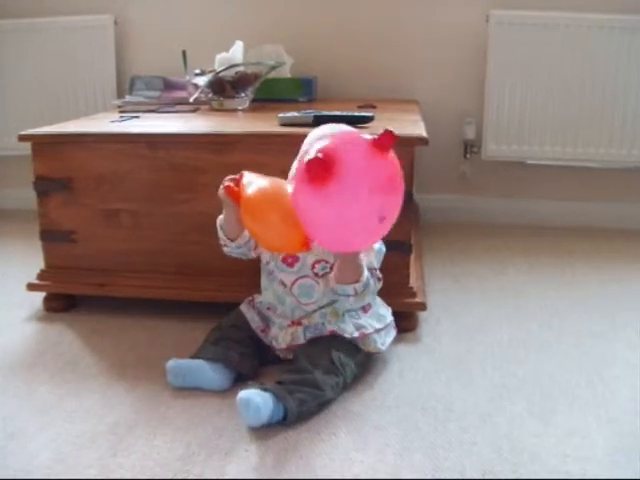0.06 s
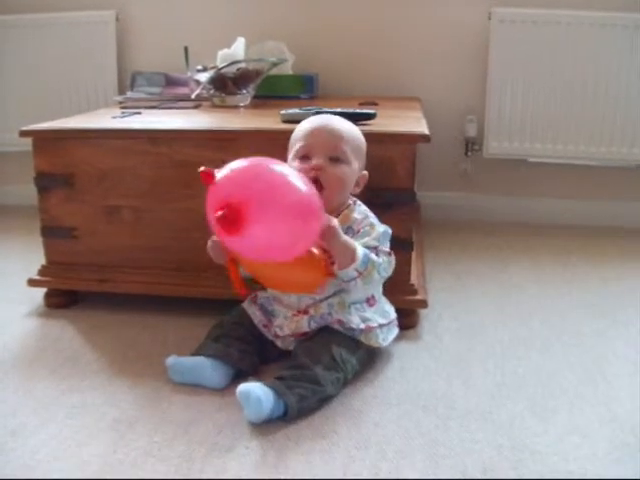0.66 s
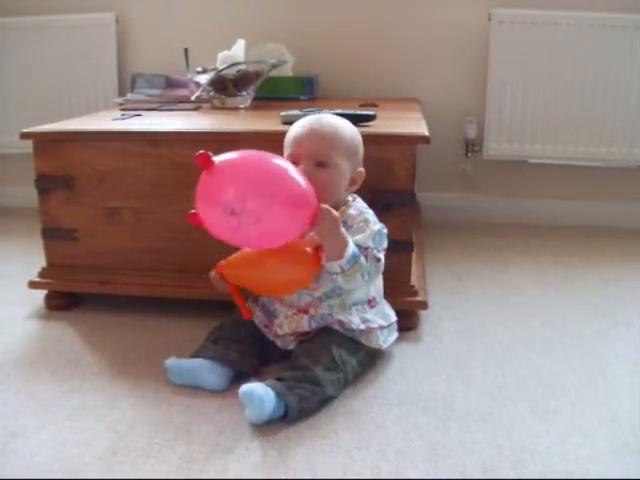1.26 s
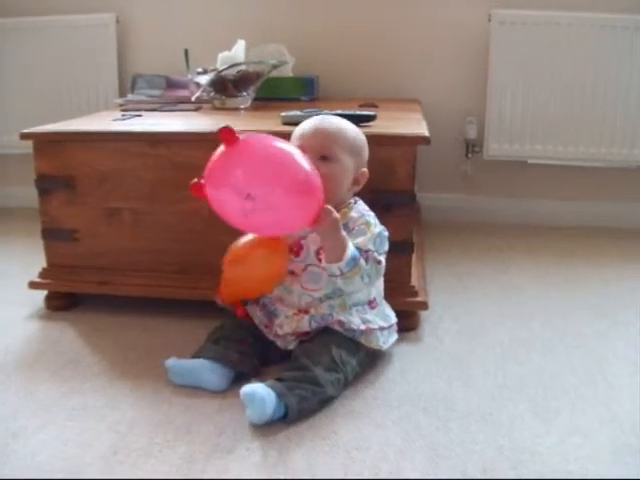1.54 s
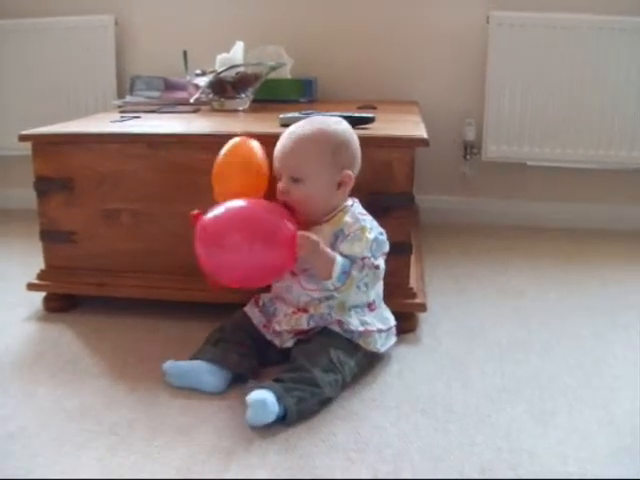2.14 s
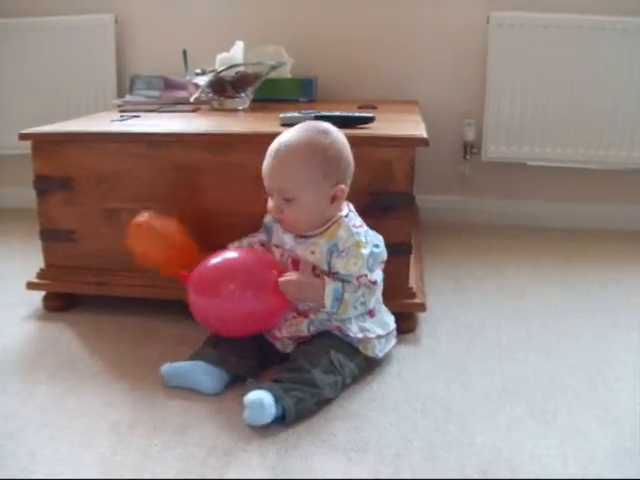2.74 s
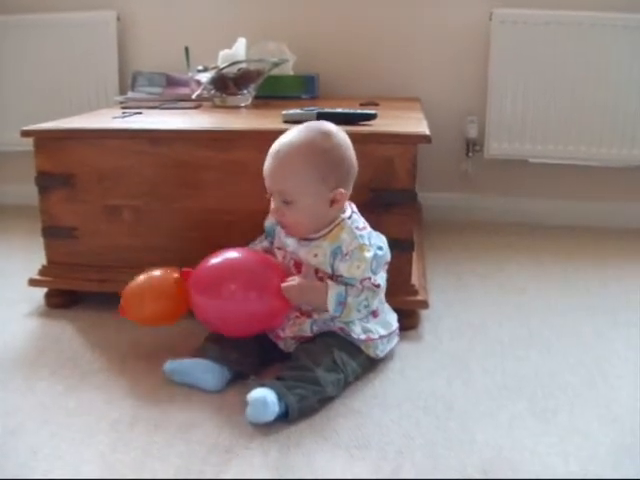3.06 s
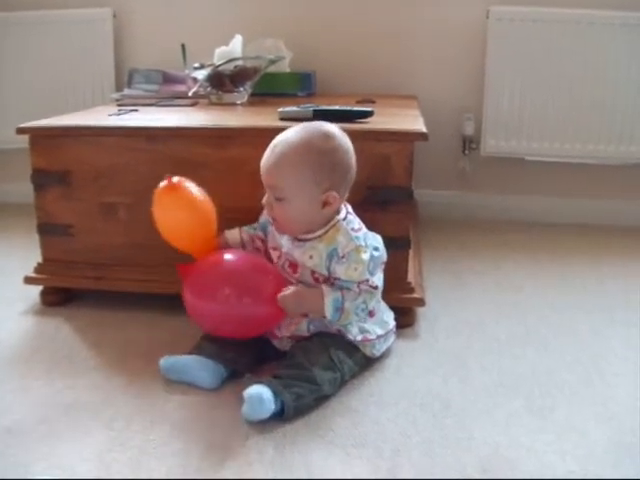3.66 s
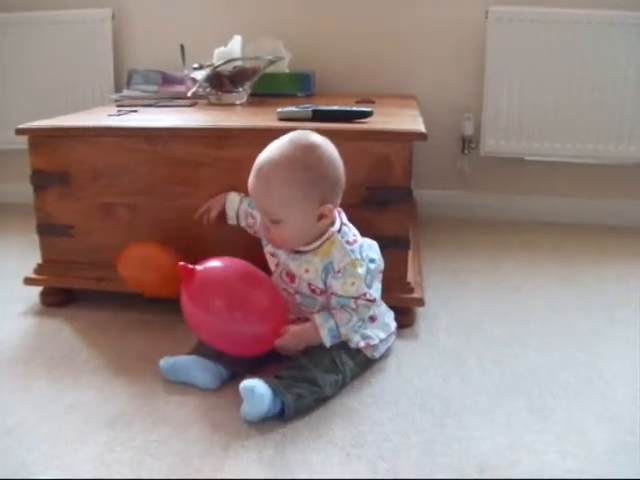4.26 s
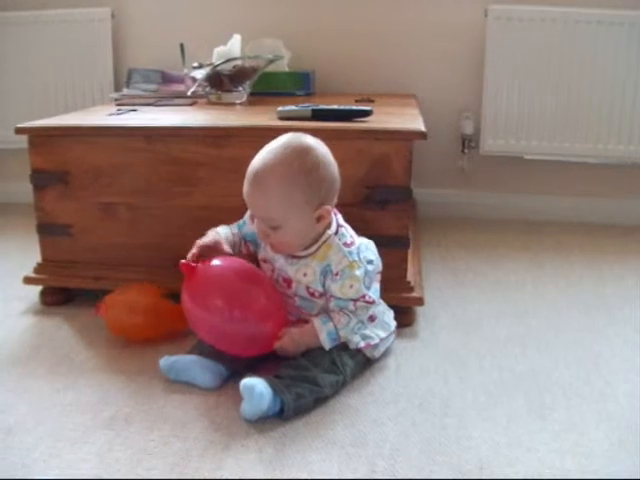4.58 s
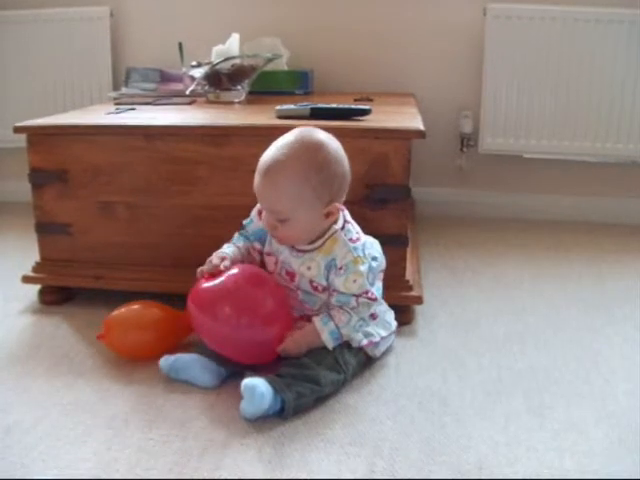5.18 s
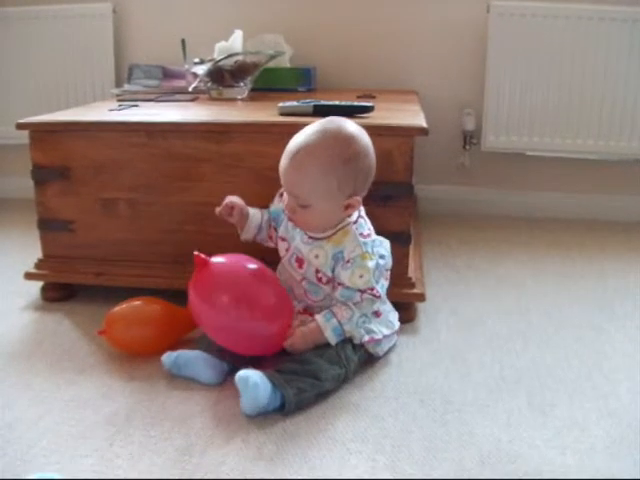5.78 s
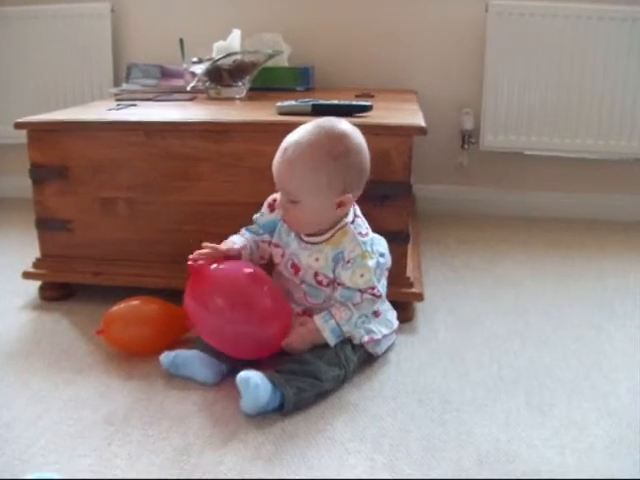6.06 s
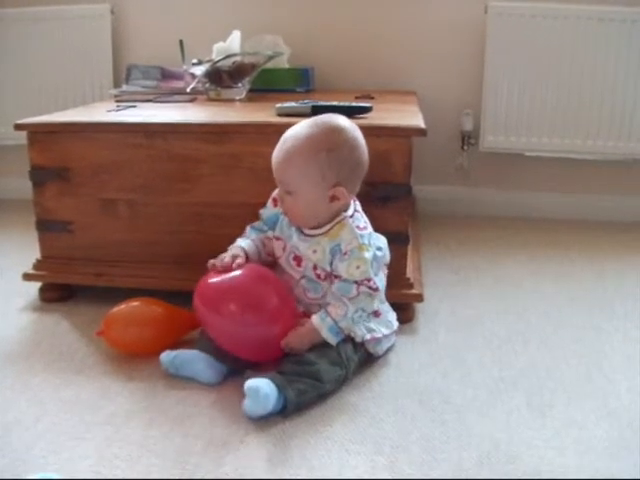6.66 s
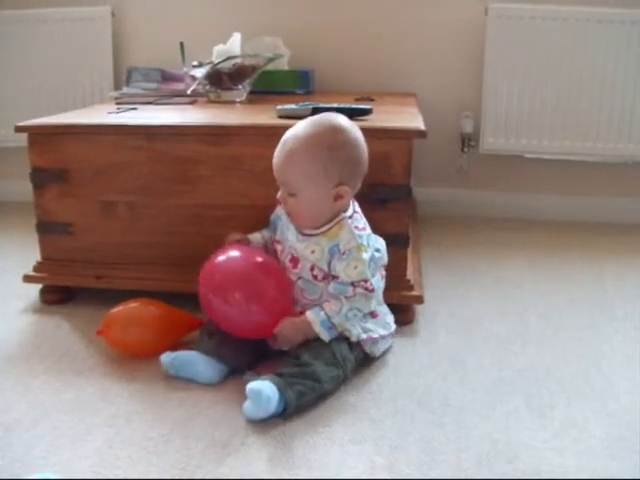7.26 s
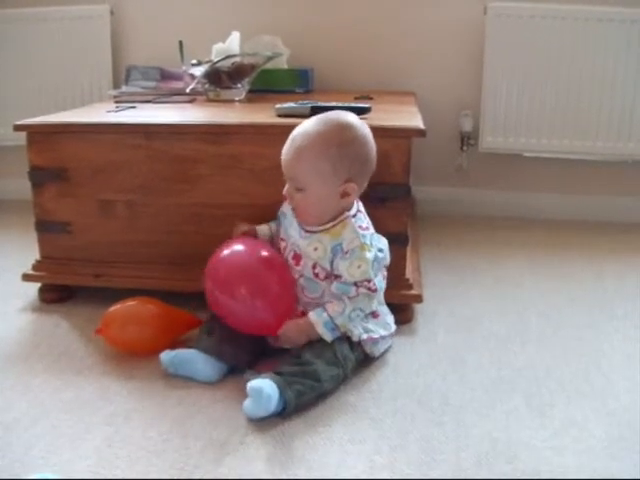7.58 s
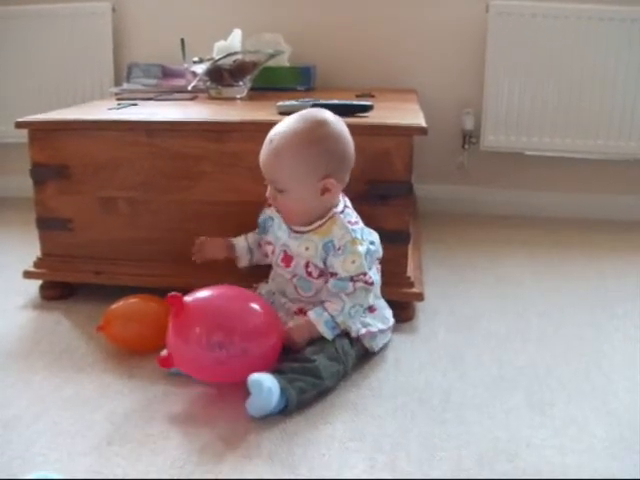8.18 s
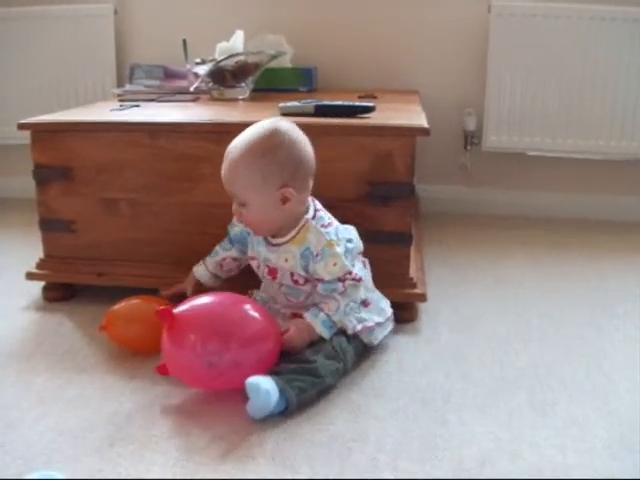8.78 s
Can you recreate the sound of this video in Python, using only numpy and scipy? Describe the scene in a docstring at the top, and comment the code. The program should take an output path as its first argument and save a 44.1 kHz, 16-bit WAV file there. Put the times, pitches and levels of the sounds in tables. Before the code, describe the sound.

A small child handles two rubber balloons in a carpeted living room, with a short echo and a steady microphone hiss underneath. A brief rub opens, then a sharp snap comes at about 0.75 seconds and a small squeak just after 1 second. From 1.5 to 4.7 seconds there are quiet, irregular fingertip taps, short rubs, soft pats and hollow bumps. At about 5.1 seconds fingers stick and slip loudly on the rubber, and a cluster of snaps ends in a heavy, deep thump at 5.75 seconds. From 6.4 to 7.5 seconds comes a busy run of jerky, squeaky rubbing and cracking. A loud snap at 7.7 seconds leads to the hardest knock, near 7.9 seconds, which booms through the floor and leaves a thin high ring. Then only the hiss remains until the end, around 9 seconds.

```python
"""A small child handles two rubber balloons in a carpeted living room, over a small camera's steady hiss.
First come quiet rubs, taps and pats: each contact snaps, rings the skin and thumps the whole balloon,
and the room answers with close echoes and a short tail. From 5 s the fingers stick and slip loudly,
and a heavy blow shakes the floor at 5.75 s. More rubbing and cracking leads to the hardest knock,
near 7.9 s, which booms through the floor and leaves a thin high ring."""
import sys
import numpy as np
from scipy import signal
from scipy.fft import rfft, irfft
from scipy.io import wavfile
from scipy.ndimage import uniform_filter1d

SR = 44100
rng = np.random.default_rng(int(sys.argv[2]) if len(sys.argv) > 2 else 0)


def master(y):
    """Save y as 16-bit WAV."""
    cut = np.clip(np.atleast_2d(y).T, -1, 1)
    pcm = np.round(cut * 32767)  # scale
    wavfile.write(sys.argv[1], SR, pcm.astype(np.int16))


N = 389396
T = np.arange(SR // 5) / SR  # time within one touch


def amp(db):
    """Decibels to gain."""
    return 10 ** (np.asarray(db) / 20)


def unit_rms(x):
    """Normalises to rms 1."""
    return x / np.sqrt(np.mean(x ** 2) + 1e-20)


def unit_peak(x):
    """Normalises the top of the envelope to 1."""
    return x / abs(signal.hilbert(x)).max()


def curve_at(points, hz):
    """Reads a breakpoint curve on a log-frequency axis."""
    f, value = np.transpose(points)
    return np.interp(np.log(hz + 1), np.log(f), value)


def eq(x, points):
    """Applies an EQ curve of f/Hz, level/dB points."""
    gain = amp(curve_at(points, np.fft.rfftfreq(len(x), 1 / SR)))
    return irfft(rfft(x) * gain, len(x))


def add(mix, s, sound):
    """Mixes a sound in at time s."""
    part = mix[max(round(s * SR), 0):][:len(sound)]
    part += sound[:len(part)]


# Tone of the noise floor: f/Hz, relative level/dB
HISS_EQ = [(15, -53), (25, -1.5), (258, -3), (299, 0.5), (354, -3.5), (507, -4), (841, -4.5), (1270, -5.5),
           (2800, -9), (7170, -10), (7900, -17), (10300, -53), (17400, -120)]
def hiss(level_db=-48.5):
    """A steady bed of microphone hiss and low room rumble."""
    return amp(level_db) * unit_rms(eq(rng.standard_normal(N), HISS_EQ))


# Rubbing strokes: start t/s, end t/s, level before trim/dB, thump re skin/dB
RUB_STROKES = [(.005, 0.094, -47.5, -13), (0.716, .745, -41.5, -13), (0.755, 0.786, -33, -9),
               (1.603, 1.659, -38, 0), (1.812, 1.918, -49.5, -18), (1.987, 2.076, -52.5, 0),
               (2.146, 2.192, -37.5, -3), (5.111, 5.255, -29.5, 4), (5.719, 5.739, -20, 4.5),
               (6.503, 6.555, -28, 1), (6.559, 6.673, -22, -5.5), (6.862, 6.906, -29, -4),
               (6.947, 6.985, -26.5, -16.5), (7.138, 7.255, -34.5, 0.5), (7.902, 7.971, -26.5, 3.5)]
def rubs(slips_per_s=170, uneven_db=4.0, skin_hz=840, body_hz=250, trim_db=-2):
    """A dragging finger sticks and slips in uneven jerks, each at a new spot on the rubber."""
    out = np.zeros(N)
    for start, end, db, thump_db in RUB_STROKES:
        onsets = np.arange(start, end, 1 / slips_per_s)
        jitter = np.clip(rng.standard_normal((len(onsets), 4)), -2, 2)
        for s, (late, size, spot, squeeze) in zip(onsets, jitter):
            skin = skin_ring(skin_hz * np.exp(0.21 * spot), rise=0.00048, scatter=0.033)
            body = body_thump(body_hz * np.exp(0.15 * squeeze), rise=0.00029, scatter=0.014)
            jerk = skin + amp(thump_db) * body + amp(crispness(db)) * crack(t60=0.029)
            add(out, s + .35 * late / slips_per_s, amp(trim_db + db + uneven_db * size) * jerk)
    return out


def rubber_modes(modes, hz, rise, scatter):
    """Damped modes; where the finger lands sets each one's share and exact pitch."""
    ratio, db, t60 = np.transpose(modes)[:, :, None]
    detune, share = rng.standard_normal((2, len(modes), 1))
    mode_hz = hz * ratio * (1 + scatter * detune)
    partials = amp(db + share - 60 * T / t60) * np.cos(2 * np.pi * mode_hz * T)
    tone = partials.sum(0) * (1 - np.exp(-T / rise))
    # soft rubber radiates little outside the span of its modes
    span_hz = [0.83 * hz * ratio.min(), 1.9 * hz * ratio.max()]
    band = signal.butter(3, span_hz, "bandpass", fs=SR, output="sos")
    return unit_peak(signal.sosfilt(band, tone))


# Modes of the skin around the finger: multiple of skin pitch, level/dB, t60/s
SKIN_MODES = [(.65, -8.5, 0.017), (1.0, -2, 0.015), (1.45, 1, 0.0055), (2.0, -12, 0.007),
              (2.6, 2.5, 0.0015)]
def skin_ring(hz, rise, scatter, damping_hz=2500):
    """The skin rings while the finger resting on it soaks up the top end."""
    damping = signal.butter(2, damping_hz, fs=SR, output="sos")
    return signal.sosfilt(damping, rubber_modes(SKIN_MODES, hz, rise, scatter))


# Modes of the whole balloon: multiple of body pitch, level/dB, base t60/s
BODY_MODES = [(.44, -21, 0.035), (.62, -6.5, 0.025), (.78, -4.5, 0.058), (1.0, 8, 0.031),
              (1.02, -15, 0.026), (1.8, -5.5, 0.0084)]
def body_thump(hz, rise, scatter, sustain=1):
    """The whole balloon thumps; sustain stretches its decay."""
    return rubber_modes(np.multiply(BODY_MODES, [1, 1, sustain]), hz, rise, scatter)


# Tone of the crack: f/Hz, relative level/dB
CRACK_EQ = [(100, -49), (400, -27), (1200, 2.5), (2500, 2), (4000, 3.5), (5200, 3), (6800, 8.5), (8000, -2)]
def crack(t60, rise=0.00039):
    """Rubber lets go with a brief, unpitched burst."""
    burst = rng.standard_normal(len(T)) * amp(-60 * T / t60) * (1 - np.exp(-T / rise))
    spectrum = rfft(np.roll(burst, SR // 2000))
    whitened = spectrum / np.sqrt(uniform_filter1d(abs(spectrum) ** 2, size=60))
    gate = T < T[-1] / 2
    return unit_peak(eq(irfft(whitened, len(T)), CRACK_EQ) * gate)


def crispness(db, light_db=-45, firm_db=-26):
    """Crack in dB re skin: a grazing contact is crisp, a firm one dull."""
    return np.interp(db, [light_db, firm_db], [0, -15])


# Hollow notes of the air inside: f/Hz, gain/dB, t60/s
AIR_MODES = [(516.4, 7, 0.15), (729, 3, 0.071), (1166, -3, .15), (1517, -1, .16), (2065, 4, 0.36)]
def air_ring(x):
    """Every contact also sets the enclosed air ringing faintly."""
    hz, db, t60 = np.transpose(AIR_MODES)[:, :, None]
    notes = amp(db - 60 * T / t60) * np.cos(2 * np.pi * hz * T)
    resonance_norm = 2 * np.log(1000) / (t60 * SR)
    return signal.fftconvolve(x, (notes * resonance_norm).sum(0))[:N]


# Early reflections off floor, chest and walls: t/s, level/dB
REFLECTIONS = [(.0035, -19.5), (.0086, -17.5), (0.0126, -9.5), (0.0175, -15), (.021, -18.5)]
# Decay of the tail: f/Hz, t60/s
TAIL_DECAY = [(60, 0.31), (250, 0.32), (600, 0.42), (1500, 0.42), (4000, 0.49), (8000, 0.36)]
# Time the tail takes to fill in: f/Hz, t/s
TAIL_ATTACK = [(100, 0.06), (300, 0.012), (1000, 0.011), (4000, .012), (8000, 0.019)]
# Tone of the tail re the dry sound: f/Hz, level/dB
TAIL_EQ = [(60, 4), (150, -5), (290, -12.5), (380, 3.5), (520, 1), (900, -2.5), (1400, -2), (1900, -7.5),
           (2600, 4.5), (8000, -4.5)]
def room(x):
    """Close echoes, then a diffuse tail that blooms and dies band by band, the bass slowest to build."""
    length = SR * 3 // 4
    hz, t, bands = signal.stft(rng.standard_normal(length), SR, nperseg=512)
    t60 = curve_at(TAIL_DECAY, hz)[:, None]
    attack = curve_at(TAIL_ATTACK, hz)[:, None]
    decay = amp(curve_at(TAIL_EQ, hz)[:, None] - 60 * t / t60)
    bloom = 1 - np.exp(-(t / attack) ** 2)
    energy_norm = np.sqrt(2 * np.log(1000) / (t60 * SR))
    impulse = signal.istft(bands * decay * bloom * energy_norm, SR, nperseg=512)[1][:length]
    for s, db in REFLECTIONS:
        impulse[round(s * SR)] += amp(db)
    return signal.fftconvolve(x, impulse)[:N]


# Body pitch, moving with the way the balloon is held: t/s, f/Hz
GRIP_PITCH = [(.75, 300), (1.1, 217), (2.0, 215), (2.15, 295), (4.53, 293.5), (5.1, 262), (5.75, 262),
              (6.5, 255), (6.62, 218), (7.04, 220), (7.11, 290), (7.42, 292), (7.47, 208), (7.7, 215),
              (7.86, 273.6)]
def touch(s, db, skin_hz, thump_db, crack_db, send_db=-1, sustain=1):
    """One contact layers skin ring, body thump and crack; returns the direct sound and its room send."""
    body_hz = np.interp(s, *np.transpose(GRIP_PITCH))
    skin = skin_ring(skin_hz, rise=0.00029, scatter=0.082)
    body = amp(thump_db) * body_thump(body_hz, rise=0.0014, scatter=0.029, sustain=sustain)
    out = np.zeros(N)
    add(out, s, amp(db) * (skin + body + amp(crack_db) * crack(t60=0.023)))
    return np.array([out, amp(send_db) * out])


# Light, crisp fingertip taps: t/s, level before trim/dB
FINGER_TAPS = [(0.742, -34.5), (2.012, -39), (2.287, -39.5), (3.192, -43.5), (3.296, -46.5), (3.436, -41),
               (3.606, -44), (3.753, -43.5), (3.93, -37.5), (4.249, -37), (4.542, -46)]
def taps(trim_db=1):
    """A fingertip hardly moves the balloon: mostly crack."""
    return sum(touch(s, trim_db + db, skin_hz=800, thump_db=-4, crack_db=12) for s, db in FINGER_TAPS)


# Sharp snaps: t/s, level before trim/dB, skin f/Hz, thump re skin/dB, crack re skin/dB
RUBBER_SNAPS = [(.753, -18, 1600, -13.5, -2.5), (2.147, -32, 830, -12, 5.5), (4.241, -28, 756, -7, -2.5),
                (5.695, -17.5, 1200, -1, -1), (5.715, -11, 1375, -6, 3.5), (5.722, -18, 853, 4, 1),
                (5.732, -19, 1230, -2, -8), (5.742, -25.5, 1198, -2, -7), (6.556, -7.5, 1585, -14, -14),
                (7.468, -21.5, 616, -4, -7.5), (7.698, -10, 950, 1, 4), (7.864, -7, 1301, 3, -.5)]
def snaps(trim_db=2):
    """Pinched rubber springs back: crack, ring and thump all at once."""
    return sum(touch(s, trim_db + db, hz, thump_db, crack_db)
               for s, db, hz, thump_db, crack_db in RUBBER_SNAPS)


# Single slips of a gripping finger: t/s, level before trim/dB, skin f/Hz, thump re skin/dB
FINGER_SLIPS = [(1.097, -26, 840, -18), (1.174, -37, 780, -20), (5.103, -13, 850, 4),
                (5.255, -20.5, 1020, -17), (5.283, -21.5, 515, -5.5), (5.316, -22, 854, -21),
                (6.449, -24, 565.5, 0), (6.497, -17.5, 1166, -0.5), (6.661, -16.5, 761, -9),
                (6.747, -16.5, 900, -5), (6.81, -21.5, 600, -5.5), (6.834, -20, 1133, -17),
                (6.85, -20, 690, -4), (6.943, -18, 886, -14), (7.041, -23.5, 660, -0.5),
                (7.112, -22, 618, 3), (7.18, -19.5, 587, -7), (7.225, -21.5, 640, -26),
                (7.38, -26, 660, -11), (7.422, -25, 830, -14), (7.449, -36, 800, -2)]
def slips(trim_db=2, crack_db=-16.5, pivot_hz=700, db_per_octave=7):
    """The tighter the skin under the finger, the higher it rings and the more it cracks."""
    return sum(touch(s, trim_db + db, hz, thump_db, crack_db + db_per_octave * np.log2(hz / pivot_hz))
               for s, db, hz, thump_db in FINGER_SLIPS)


# A balloon swings into the child or the carpet: t/s, touch level before trim/dB, boom level/dB
BALLOON_BUMPS = [(1.54, -41, -37), (2.002, -42, -34), (2.12, -44, -51), (2.141, -37, -26.5),
                 (2.249, -46, -31), (2.498, -42, -39), (4.242, -38, -37), (4.71, -49.5, -42),
                 (5.617, -21, -27), (5.749, -10, -21.5)]
def bumps(trim_db=2):
    """A broad contact lays a deep boom under the thump."""
    return sum(touch(s, trim_db + db, skin_hz=560, thump_db=3, crack_db=crispness(db), send_db=0)
               + boom(s, boom_db, hz=96, t60=.11) for s, db, boom_db in BALLOON_BUMPS)


def boom(s, db, hz, t60, rise=0.0036):
    """Low-end weight: one dying sine with a soft attack."""
    out, t = np.zeros(N), np.arange(SR // 2) / SR
    envelope = amp(db - 60 * t / t60) * (1 - np.exp(-t / rise))
    add(out, s, envelope * np.sin(2 * np.pi * hz * t))
    return out


# Dull pats of the palm: t/s, level before trim/dB
PALM_PATS = [(1.599, -48), (4.249, -33.5), (4.351, -44), (4.457, -48), (4.532, -29.5), (5.085, -33.5),
             (5.095, -29.5), (5.142, -22.5), (5.184, -30), (5.7, -20.5), (6.424, -36), (6.595, -30),
             (6.616, -27)]
def pats(trim_db=2):
    """A soft palm moves the whole balloon and lets it ring longer: mostly thump."""
    return sum(touch(s, trim_db + db, skin_hz=515, thump_db=6, crack_db=-15, send_db=1, sustain=2.6)
               for s, db in PALM_PATS)


# Booms of the floor: t/s, level/dB, f/Hz, t60/s
FLOOR_THUDS = [(5.750, -31, 37, 0.45), (7.863, -8.5, 86, 0.047), (7.866, -22, 45.2, 0.19)]
def floor_thuds():
    """The heaviest blows shake the floor."""
    return sum(boom(*row) for row in FLOOR_THUDS)


def high_ring(start_s=7.866, db=-35, hz=3850, width_hz=600, t60=0.67):
    """The hardest knock leaves a thin cluster of high modes that dies slowly."""
    out, t = np.zeros(N), np.arange(SR // 2) / SR
    position, phase = rng.random(size=(2, 40, 1))
    mode_hz = hz + width_hz * (position - .5)
    cluster = np.sin(2 * np.pi * (mode_hz * t + phase)).sum(0)
    add(out, start_s, amp(db - 60 * t / t60) * unit_rms(cluster))
    return out


def scene():
    """The mono mix: balloons up close and through the room, over the hiss."""
    direct, room_send = taps() + pats() + bumps() + slips() + snaps() + rubs() + floor_thuds()
    return (direct + air_ring(direct) + room(room_send) + high_ring() + hiss())[None]


def high_cut(x, hz):
    """A steep low-pass."""
    kernel = signal.firwin(301, hz, window=("kaiser", 8), fs=SR)
    return signal.oaconvolve(x, kernel[None], "same")


def record(dry, mic_hz=8000, ceiling_hz=16500):
    """A narrow-band microphone; the loudest knocks soft-clip at full scale, which adds a little top."""
    mic = high_cut(dry, mic_hz)
    clipped = mic / (1 + mic ** 8) ** (1 / 8)
    return high_cut(clipped, ceiling_hz)


dry = scene()
out = record(dry)
master(out)
```